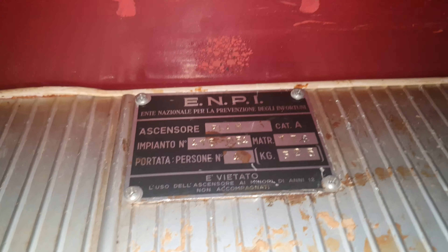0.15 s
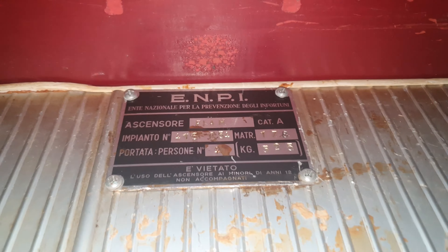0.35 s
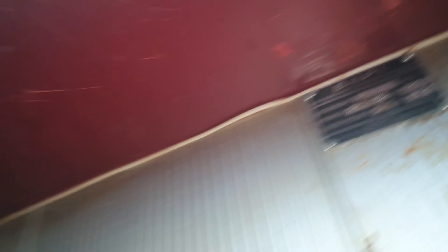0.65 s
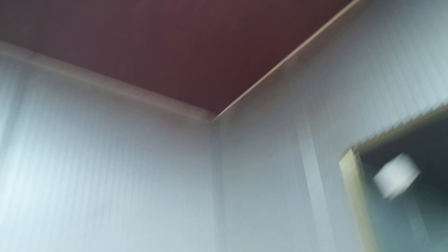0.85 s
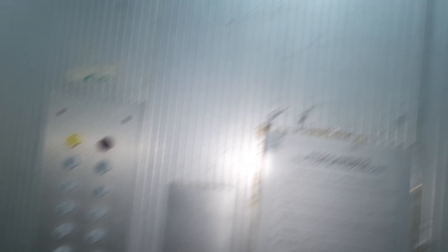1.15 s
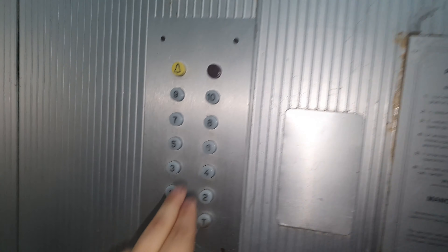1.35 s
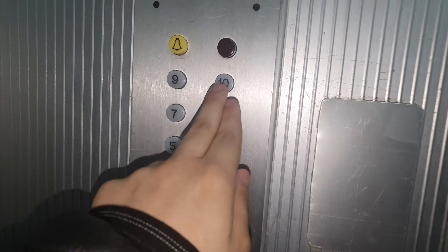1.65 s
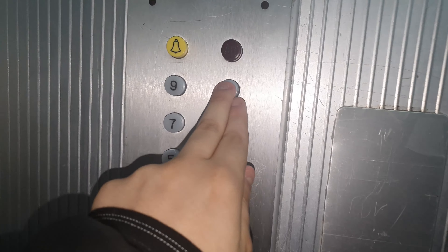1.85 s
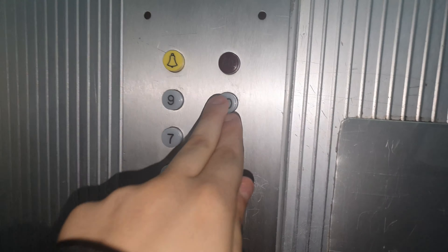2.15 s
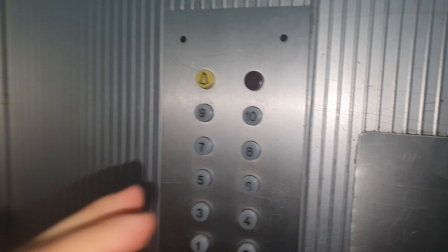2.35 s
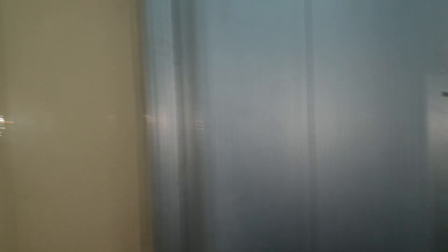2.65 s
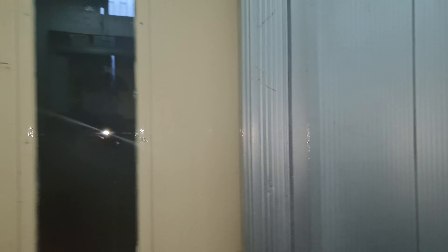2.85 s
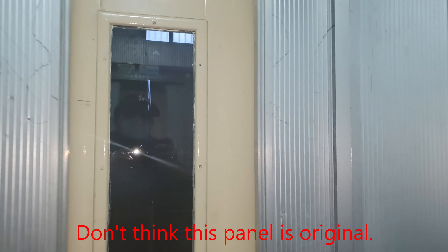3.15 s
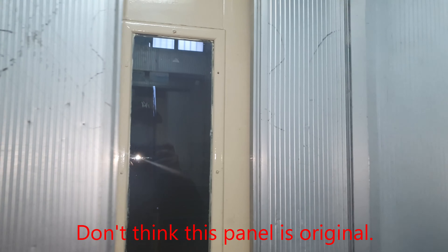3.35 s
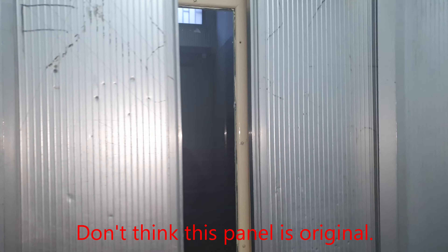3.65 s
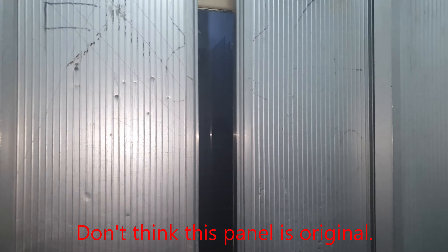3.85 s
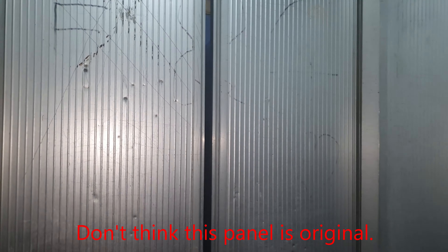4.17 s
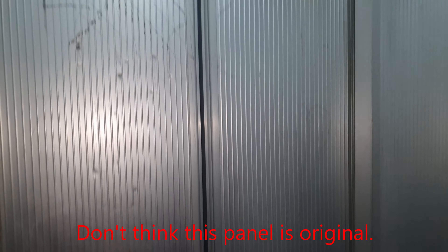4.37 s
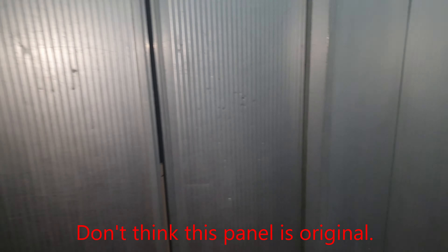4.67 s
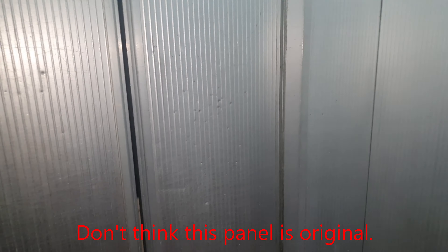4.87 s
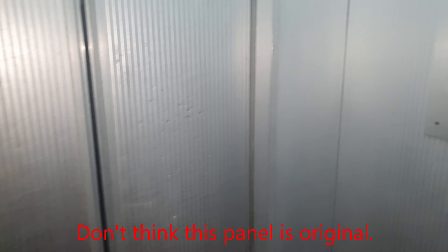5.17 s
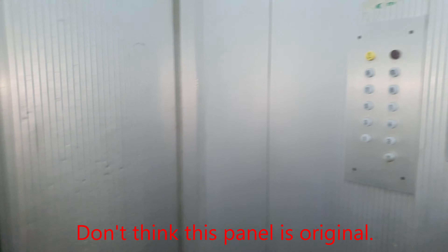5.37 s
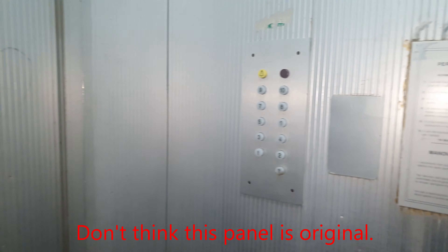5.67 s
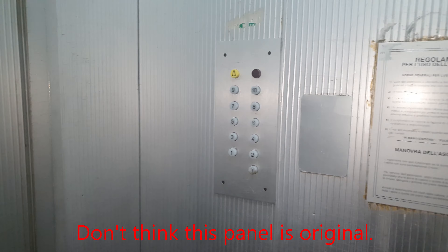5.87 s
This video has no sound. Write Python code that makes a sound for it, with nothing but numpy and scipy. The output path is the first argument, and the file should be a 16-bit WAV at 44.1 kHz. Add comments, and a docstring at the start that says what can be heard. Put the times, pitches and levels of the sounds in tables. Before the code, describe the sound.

A handheld stereo microphone sits between thin metal walls. First comes a heavy multiple door slam with a low boom and short dull shaft echo, then near quiet with faint rumble. A sharp button clunk starts the door drive; rollers grind, tick and squeak, panels knock unevenly, then two loud bangs close the doors. Smaller latch knocks and a last scrape die into soft rumble and hiss.

```python
"""Inside a small metal lift car, heard by a two-port microphone among the walls: first a landing door slams and
the stairwell rumbles on, then a button is pushed, then the sliding doors jolt, rattle along their track and
latch. Every blow rings the same car modes and throws a burst of noisy panel clatter. A low rumble runs
throughout, stronger with the door drive on, over a faint flickering hiss that swells while the doors move; as
they move, the rollers scrape and squeak. A short dull tail from the shaft answers blows and squeaks."""
import sys
import numpy as np
from scipy import signal
from scipy.fft import rfft, irfft
from scipy.io import wavfile
from scipy.ndimage import uniform_filter1d

SR = 44100
rng = np.random.default_rng(int(sys.argv[2]) if len(sys.argv) > 2 else 0)


def transcribe(signal):
    """Save signal, clipped to [-1, 1], as a 16-bit WAV file at the path in sys.argv[1]."""
    frames = np.atleast_2d(signal).T
    limited = np.clip(frames, -1, 1)
    pcm = np.round(limited * 32767).astype(np.int16)
    wavfile.write(sys.argv[1], SR, pcm)


N = 265173

# Blows of slam, button and doors: start_s, clatter_db, sizzle_over_clatter_db, knock_db, knock_centre_hz,
# boom_db, boom_centre_hz, clatter_t60_s, clank_over_clatter_db, thud_db
BLOWS = [(0.0334, -12.5, -20.5, -23, 735, -6.5, 183, 0.21, -4, -16.5),
         (0.2031, -16, -18.5, -23, 970, -3.5, 155, 0.19, -6.5, -10.5),
         (0.287, -13, -15.5, -47, 507, -17, 218, 0.26, -12, -29),
         (0.333, -12, -17.5, -29, 460, -9, 185, 0.14, -9, -20),
         (0.342, -16, -17, -35, 465, -20, 181, 0.16, -0.5, -19),
         (0.7183, -39.5, -16, -49, 570, -25.5, 106, 0.39, -3.5, -50),
         (1.07, -39.5, -17, -52, 600, -45, 60, 0.14, -6.5, -45),
         (1.209, -46, -15, -69, 475, -25.5, 59.6, 0.51, -11, -52),
         (1.688, -48, -12, -46, 497, -44, 97, 0.1, 2.5, -49),
         (1.7871, -44, -29.5, -39, 474, -45, 67, 0.26, 3, -37),
         (1.8606, -37.5, -23, -36.5, 646, -25.5, 89, 0.22, -5, -35),
         (1.949, -48, -18, -29, 804, -50, 143, 0.63, 1, -42),
         (2.0039, -59, -15, -27.5, 790, -26, 70, 0.24, 4, -24),
         (2.0357, -19.5, -28, -9, 486, -7, 180, 0.18, -3.5, -9),
         (2.1186, -16, -21, -34, 900, -18.5, 182, 0.12, -9, -22),
         (2.338, -28.5, -22.5, -23.5, 740, -18, 61, 0.2, -1, -18),
         (2.352, -39, -17, -21.5, 710, -24, 180, 0.15, -13, -36),
         (2.369, -26, -11.5, -23.5, 670, -30, 72, 0.074, -14, -19),
         (2.4274, -34, -16, -42, 620, -18.5, 90, 0.3, -9, -37),
         (2.4393, -39.5, -12, -26, 635, -17, 60, 0.91, 1.5, -31),
         (2.59, -26, -15.5, -36, 503, -24, 93, 0.15, -6.5, -28),
         (2.63, -34, -20, -19.5, 575, -30.5, 92, 0.053, -2, -20.5),
         (2.74, -35, -15, -63, 540, -44, 75, 0.51, -10, -51),
         (2.8776, -17.5, -28, -31.5, 860, -33.5, 100, 0.21, -7, -25),
         (3.23, -29, -28, -33, 654, -27, 99.5, 0.18, -9, -25),
         (3.2904, -30.5, -22, -37, 467, -21, 60.8, 0.64, -3.5, -37),
         (3.3424, -24.5, -25, -30, 540, -18.5, 92.2, 0.38, -10, -26),
         (3.437, -24, -34.5, -25.5, 560, -46, 95, 0.24, -4, -34),
         (3.4828, -21, -26, -25.5, 550, -32, 102, 0.2, -9, -37),
         (3.5652, -25, -30.5, -25, 570, -30.5, 90, 0.33, -5, -27),
         (3.6488, -24.5, -30, -22.5, 463, -22, 70, 0.32, -7.5, -21.5),
         (3.6998, -31, -36, -46, 606, -26, 102, 0.24, -9, -25),
         (3.7801, -22.5, -32.5, -29.5, 510, -30, 84, 0.27, -5, -26.5),
         (3.913, -12, -14, -18, 600, -18, 81, 0.13, -1, -16.5),
         (3.962, -29.5, -19, -14.5, 850, -31.5, 78, 0.19, -1.5, -16),
         (3.968, -7, -21.5, -10, 623, -23.5, 77, 0.23, -9, -23.5),
         (4.0621, -41.5, -18, -17, 508, -27, 180, 0.43, 11.5, -21),
         (4.0895, -14.5, -24.5, -13.5, 523, -22.5, 75, 0.12, -10, -15),
         (4.112, -32.5, -13, -15, 576, -29, 90, 0.21, 3, -18),
         (4.1419, -20, -26.5, -24, 476, -26, 87.5, 0.16, -8.5, -21),
         (4.267, -42.5, -6, -25, 465, -22.5, 93, 0.17, 3, -27),
         (4.2915, -32, -33, -22, 510, -35, 92, 0.22, 2.5, -28),
         (4.332, -55, -25, -27, 535, -36, 92, 0.2, -9.5, -37),
         (4.3899, -41, -21, -29.5, 455, -27, 247, 0.39, -2.5, -25),
         (4.5446, -23.5, -27.5, -29, 506, -31.5, 243, 0.11, -6.5, -24),
         (4.628, -31.5, -19, -39.5, 850, -29.5, 93.5, 0.26, -17.5, -28.5),
         (4.659, -48, -18, -35.5, 810, -34, 94, 0.28, -11, -33),
         (4.769, -56, -38, -39, 480, -28.5, 84, 0.2, 4, -35),
         (4.802, -60.5, -30, -36.5, 500, -48, 94, 0.25, -4, -45),
         (4.945, -60, -16, -40.5, 496, -39, 55, 0.22, -7, -44)]
# Modes of the car walls: pitch_hz, level_db, base_t60_s (scaled for each use)
CAR_MODES = [(44.9, -2, 0.99), (70.1, -4, 0.61), (94.1, -1.5, 0.87), (155.9, 4.5, 0.53), (183.9, 3.5, 0.97),
             (233.5, 3.5, 0.37), (284.6, 1, 0.35), (310.1, -2.5, 0.24), (351.3, -4.5, 0.47),
             (407.3, 0.5, 0.28), (438.5, -5, 0.21), (492.6, 0, 0.13), (552, -13.5, 0.46), (592, -8.5, 0.32),
             (661, -14, 0.6), (711, -8.5, 0.29), (790, -8.5, 0.16), (869, -7.5, 0.22)]
# Modes of the door panels: pitch_hz, level_db, base_t60_s (scaled for each use)
PANEL_MODES = [(934, -6.5, 0.28), (1096, -9, 0.25), (1202, 2, 0.17), (1347, -2.5, 0.032), (1465, -9, 0.099),
               (2176, -1, 0.058), (2530, -3, 0.09), (3000, -5, 0.11), (3326, -3, 0.075), (3842, -2, 0.096),
               (4340, 2, 0.037), (5370, 15, 0.012), (6140, 3, 0.11)]
# Spectrum of loose panels clattering: pitch_hz, level_db (per Hz)
CLATTER_SPECTRUM = [(470, -30), (800, 2), (1200, -1), (2440, -7), (4160, -8), (6920, -9), (8030, -18),
                    (9320, -16), (15500, -26.5)]
CLATTER_HZ, CLATTER_SPREAD_OCTAVES = 3295, 0.31  # random spread of the clatter centre from blow to blow
# Blows with less sizzle than DULL_DB clatter lower, narrower and more ringing
DULL_DB, DULL_OCTAVES_PER_DB, FOCUS_OCTAVES = -17, 0.025, 1.6
SLAM_ENDS_S = 0.4
SLAM_BOOM_RING, JOLT_BOOM_RING = 0.48, 0.57  # share of the base ring time left to the boom


def blows():
    """Each blow throws a burst of clatter, rings the door panels and sets the car walls ringing."""
    out = np.zeros((2, N + SR))
    clank = pair(band(CLATTER_SPECTRUM, 1000, 1800))
    clatter = pair(band(CLATTER_SPECTRUM, 1800, 7500))
    sizzle = pair(band(CLATTER_SPECTRUM, 7500, 20000))
    bounce = undb(1.8 * walk(120))  # loose panels rebound unevenly
    # the walls buzz, so rings die unevenly
    shudder = np.pad(undb(1.62 * walk(70)), (0, SR), mode="reflect")
    low_panel, high_panel = between(PANEL_MODES, 0, 1800), between(PANEL_MODES, 1800, SR)
    n = SR // 5
    t = np.arange(n) / SR
    bin_hz = np.arange(n // 2 + 1) * SR / n
    shifts = 2 ** (CLATTER_SPREAD_OCTAVES * rng.standard_normal(len(BLOWS)))
    for blow, shift in zip(BLOWS, shifts):
        (start_s, clatter_db, sizzle_db, knock_db, knock_hz,
         boom_db, boom_hz, t60, clank_db, thud_db) = blow
        i = int(start_s * SR) - 40  # a short lead for the gradual onset
        now = slice(i, i + n)
        dull = max(DULL_DB - sizzle_db, 0)
        centre_hz = CLATTER_HZ * shift * 2 ** (-DULL_OCTAVES_PER_DB * dull)
        focus = FOCUS_OCTAVES / (1 + 0.084 * dull)

        rise_s = 0.00056 + 0.038 * t60 ** 2  # long rattles build up more slowly
        burst = (1 - np.exp(-t / rise_s)) * fall(t, t60) * bounce[now]
        coloured = unit(irfft(rfft(clatter[:, now]) * undb(favour(bin_hz, centre_hz, focus)), n))
        sound = undb(-4.0) * burst * coloured
        sound += undb(sizzle_db + 2.0) * burst ** 1.03 * sizzle[:, now]

        high_ring = ring(high_panel, t, 5.2 * t60, 0.0039, centre_hz, 0.64, detune=0.022)
        sound += undb(-4.5 + 0.2 * dull) * shudder[now] * high_ring

        low_ring = ring(low_panel, t, 7.4 * t60, 0.003, 1100.0, 1.5, spread_db=-1.5, detune=0.01)
        clanking = undb(-2.5) * burst * clank[:, now] + undb(-7.5) * shudder[now] * low_ring
        sound += undb(clank_db) * clanking
        out[:, now] += undb(clatter_db) * sound

        boom_ring = SLAM_BOOM_RING if start_s < SLAM_ENDS_S else JOLT_BOOM_RING
        low = car_ring(knock_db, knock_hz, thud_db, boom_db, boom_hz, boom_ring)
        out[:, i:i + low.shape[1]] += low * shudder[i:i + low.shape[1]]
    return out[:, :N]


def car_ring(knock_db, knock_hz, thud_db, boom_db, boom_hz, boom_ring):
    """Decaying car modes answer one blow in three bands: a knock, a thud and a boom."""
    knock = between(CAR_MODES + PANEL_MODES, 460, 1000)
    thud, boom = between(CAR_MODES, 260, 460), between(CAR_MODES, 0, 260)
    # knock and thud modes are doubled: each copy is detuned, so the close pair beats
    knock, thud = knock + knock, thud + thud
    # the modes are slow, so they are drawn at a twentieth of the rate and smoothed up
    t = np.arange(SR // 40) / (SR / 20)
    low = undb(knock_db) * ring(knock, t, 0.82, 0.002, knock_hz, 0.4, spread_db=3.5, detune=0.0163)
    low += undb(thud_db) * ring(thud, t, 0.79, 0.0053, 330., 0.76, spread_db=1.0, detune=0.02)
    low += undb(boom_db) * ring(boom, t, boom_ring, 0.0076, boom_hz, 0.68, scatter=0.68)
    return signal.resample_poly(low, 20, 1, axis=1)


def ring(modes, t, damp, rise_s, centre_hz, octaves, spread_db=7.0, detune=0.016, lag_s=0.00032,
         scatter=2.954):
    """Modes set ringing by one blow, which favours those near its centre; scaled by their summed power."""
    f, db, t60 = np.transpose(modes)
    chance = rng.standard_normal((4, len(f)))
    hz = f * (1 + detune * chance[1])
    pole = 2j * np.pi * hz - np.log(1000) / (damp * t60)
    level = undb(db + favour(f, centre_hz, octaves) + spread_db * chance[0])
    # the scatter sets how far the modes start out of step: the default leaves their phases at random, while a
    # small one, as for the boom, starts them nearly in step
    size = level * np.exp(1j * (scatter * chance[2] - np.pi / 2))
    # each mode reaches the two ports from its own side
    turn = np.exp(1j * np.pi * hz * lag_s * chance[3])
    out = (np.array([size * turn, size / turn]) @ np.exp(pole[:, None] * t)).real
    return out * (1 - np.exp(-t / rise_s)) / np.sqrt(np.sum(np.abs(size) ** 2))


# Roller squeaks: start_s, length_s, start_pitch_hz, end_pitch_hz, level_db, roughness (ratio)
SQUEAKS = [(0.71, 0.021, 2650, 2800, -39.5, 1.4), (2.179, 0.066, 1243, 1243, -38.5, 0.33),
           (2.24, 0.041, 1250, 1220, -35.5, .3), (2.366, 0.025, 3054, 3020, -36, .5),
           (2.43, .07, 2750, 2650, -42, .9), (2.454, 0.03, 4430, 4430, -37, .7),
           (2.473, 0.087, 5440, 5500, -40, .6), (2.53, 0.05, 4650, 4800, -35, .9),
           (2.7, 0.023, 3550, 3280, -35.5, 1.3), (2.768, 0.023, 4260, 4260, -37, .8),
           (2.772, 0.038, 2750, 2800, -51, .7), (3.34, 0.034, 2420, 2430, -28, 0.51),
           (3.44, 0.032, 2250, 2220, -34, .6), (3.482, 0.022, 2230, 2200, -35, 0.55),
           (4.587, 0.153, 2600, 2820, -43, 1.1)]


def squeaks():
    """Short rough tones where a roller sticks and slips: each slip nudges the size and phase."""
    out = np.zeros((2, N))
    slip = walk(420) + 1j * walk(460)
    port_phase = np.array([[0], [1.5]])  # radians
    for start_s, length_s, start_hz, end_hz, db, rough in SQUEAKS:
        i, n = int(start_s * SR), int(length_s * SR)
        phase = 2 * np.pi * np.cumsum(np.linspace(start_hz, end_hz, n)) / SR
        nudge = (1 + rough * slip[i:i + n]) / np.hypot(1, rough)
        tone = nudge * np.exp(1j * (phase + port_phase))
        out[:, i:i + n] += undb(db) * np.hanning(n) ** 0.6 * tone.real
    return out


# Level of the scrape and hiss, with a faint steady background between door movements:
# start_s, scrape_db, hiss_db (before their flicker)
SCRAPE_AND_HISS = [(0, -57, -70), (0.4, -48, -72), (0.84, -49, -62.5), (1.1, -53.5, -66),
                   (1.45, -49, -64.5), (1.61, -53, -64), (1.76, -62.5, -75), (2.02, -54, -71),
                   (2.14, -38, -59), (2.26, -47.5, -62), (2.53, -35.5, -50), (2.71, -40.5, -50),
                   (2.96, -49.5, -61), (3.25, -39.5, -55), (3.57, -31, -50), (3.82, -44, -58.5),
                   (3.98, -31, -70), (4.2, -53, -60), (4.3, -40.5, -59), (4.42, -55.5, -60.5),
                   (4.59, -37.5, -47), (4.75, -53, -61.5), (4.99, -68.5, -89), (5.15, -56, -60),
                   (5.35, -55.5, -63), (5.59, -51, -64.5), (6.01, -56.5, -68.5)]
# Centre of the scrape, highest as the doors get under way: start_s, pitch_hz
SCRAPE_CENTRE = [(0, 2800), (2.0, 2400), (2.15, 3400), (2.55, 4360), (2.95, 2710), (3.85, 2500),
                 (4.1, 3100), (4.8, 2780), (5.15, 3640), (5.6, 2640)]
# Spectrum of the scrape: pitch_hz, level_db (per Hz)
SCRAPE_SPECTRUM = [(410, -32), (700, -15), (1140, -1.5), (1580, -5), (2370, -4), (3550, -6), (5000, -8.5),
                   (6150, -7.5), (8420, -16.5), (11700, -13.5), (16000, -20.5)]


def scrape_and_hiss():
    """Rollers scrape the track in uneven patches of noise and tick the panel modes, with a hiss on top."""
    scrape_db, hiss_db = curve(SCRAPE_AND_HISS)
    centre_hz, = curve(SCRAPE_CENTRE)
    grain = walk(45)
    edges = 800 * 2 ** np.arange(0, 3.3, .54)
    # a louder scrape gathers round its centre and grows grittier
    tight = np.clip((scrape_db + 50.5) / 15, 0.25, 1.5)
    broad = np.zeros((2, N))
    for lo, hi in zip(edges, edges[1:]):
        patch_db = tight * favour(lo * 1.12, centre_hz, 1.24) + band_db(SCRAPE_SPECTRUM, lo, hi)
        broad += pair(band(SCRAPE_SPECTRUM, lo, hi)) * undb(patch_db + 2.0 * tight * walk(28.13))
    panels = np.zeros((2, N))
    for hz, _, t60 in PANEL_MODES[2:]:
        panels += ticks(hz, t60) * undb(favour(hz, centre_hz, 0.75))
    scrape = undb(-1.5) * broad + undb(-11.0) * tight * panels
    scrape *= undb(scrape_db + 2.2 * tight * grain)
    hiss = pair(band(SCRAPE_SPECTRUM, 7500, 20000)) * undb(hiss_db + grain)
    return scrape + hiss


TICKS_PER_S, TICK_SPREAD_DB, TICK_DAMP, TICK_WANDER = 400, 2.5, 0.8, 0.05  # for each panel mode


def ticks(hz, t60):
    """Grit under the rollers strikes one panel mode, a two-pole resonator, at random moments."""
    chance = rng.random((int(TICKS_PER_S * N / SR), 4)).T
    size = undb(-TICK_SPREAD_DB * np.log(chance[1] + 1e-9))
    port_phase = np.array([[0], [1]]) * 2 * (chance[3] - .5) * np.pi
    strikes = np.zeros((2, N))
    strikes[:, (chance[0] * N).astype(int)] = size * np.cos(2 * np.pi * chance[2] + port_phase)
    r = np.exp(-np.log(1000) / (TICK_DAMP * max(t60, .06) * SR))
    rung = signal.lfilter([1], [1, -2 * r * np.cos(2 * np.pi * hz / SR), r ** 2], strikes)
    # the pitch of the ticks wanders at random
    read_at = np.cumsum(1 + TICK_WANDER * walk(14)) % (N - 1)
    return unit(np.array([np.interp(read_at, np.arange(N), side) for side in rung]))


# Low shaking of the car, at rest and with the door drive on: start_s, level_db
DRIVE = [(0, -36), (0.9, -45), (1.61, -46.5), (1.76, -51.5), (1.86, -36), (2.02, -33.5), (2.14, -22.5),
         (2.26, -29.5), (2.38, -27), (3.3, -27.5), (3.82, -21.5), (3.98, -35.5), (4.22, -29), (4.52, -23.5),
         (4.75, -37.5), (4.9, -41.5), (5.15, -44.5), (5.31, -43), (5.93, -43.5), (6.01, -37.5)]
DRONE_DB, RATTLE_DB = -10, -9  # drone against the shaking; rattle against shaking mixed with scrape
RATTLE_FROM_SCRAPE = 0.28  # share of the scrape level in that mix
AFTER_RUMBLE_DB, AFTER_DRONE_DB, AFTER_RATTLE_DB = -11, -11.5, -8  # tail below the blow


def shaking():
    """Noise through the car modes makes rumble, drone and rattle, raised by a tail after each blow."""
    drive_db, = curve(DRIVE)
    scrape_db, _ = curve(SCRAPE_AND_HISS)
    knock_tail, boom_tail = low_tail(column=3), low_tail(column=5)  # after the knocks and the booms
    rumble_db = add_tail(drive_db, AFTER_RUMBLE_DB, boom_tail)
    drone_db = add_tail(drive_db + DRONE_DB, AFTER_DRONE_DB, boom_tail)
    rattle_db = mix(drive_db, scrape_db, RATTLE_FROM_SCRAPE) + RATTLE_DB
    rattle_db = add_tail(rattle_db, AFTER_RATTLE_DB, knock_tail)
    rumble = pair(resonant(CAR_MODES, 0, 130, widen=3.0)) * undb(rumble_db)
    drone = pair(resonant(CAR_MODES, 130, 330, widen=4.0)) * undb(drone_db + 0.45 * walk(25.06))
    # the rattle swings unevenly, by the same amount throughout
    rattle = pair(resonant(CAR_MODES, 330, 1000, widen=9.5)) * undb(rattle_db + 3.5 * walk(40))
    return rumble + drone + rattle


SLAM_T60_S, JOLT_T60_S = 1.184, 0.27  # how long the low tail lasts after the slam and after later blows


def low_tail(column):
    """Power of the low tail that follows the blows, dying away after each."""
    out, t = np.zeros(N), np.arange(N) / SR
    for row in BLOWS:
        i = int(row[0] * SR)
        after = t[:N - i]
        t60 = SLAM_T60_S if row[0] < SLAM_ENDS_S else JOLT_T60_S
        out[i:] += (undb(row[column]) * fall(after, t60) * (1 - np.exp(-after / 0.016))) ** 2
    return out


def add_tail(steady_db, after_db, power):
    """Level in dB once the power of the tail is added to a steady level."""
    return 10 * np.log10(undb(2 * steady_db) + undb(2 * after_db) * power)


def resonant(modes, lo, hi, widen):
    """Gain per bin of a set of modes driven by steady shaking."""
    hz = np.arange(N // 2 + 1) * SR / N
    power = 0
    for f, db, t60 in between(modes, lo, hi):
        peak = undb(2 * db) / (1 + ((hz - f) * t60 / widen) ** 2)
        power = power + peak * (hz / f) ** 2 / (1 + (hz / f) ** 4)
    return np.sqrt(power)


SHAFT_DB, SHAFT_T60_S = -17, 0.53


def shaft(x):
    """A dull diffuse tail from the lift shaft: decaying low-passed noise, partly shared by the ports."""
    t = np.arange(SR) / SR
    tail = rng.standard_normal((2, SR)) * fall(t, SHAFT_T60_S) * (1 - np.exp(-t / 0.0036))
    tail = signal.lfilter([1], [1, -.6], tail)
    tail[1] = .5 * tail[0] + 0.15 * tail[1]
    tail /= np.sqrt(np.sum(tail[0] ** 2))
    return undb(SHAFT_DB) * signal.fftconvolve(x, tail, axes=1)[:, :N]


def undb(db):
    """Amplitude of a level in dB."""
    return 10 ** (np.asarray(db) / 20)


def unit(x):
    """Scale to an RMS of 1."""
    return x / np.sqrt(np.mean(x ** 2))


def fall(t, t60):
    """Exponential decay by 60 dB in t60 seconds, never quicker than 0.02 s."""
    return np.exp(-np.log(1000) * t / max(t60, .02))


def walk(rate):
    """Random levels held 1 / rate s and slewed twice; they swing around zero."""
    k = int(SR / rate)
    steps = np.repeat(rng.standard_normal(N // k + 1), k)
    return 0.96 * uniform_filter1d(uniform_filter1d(steps, k), k)[:N]


def pair(gain, alike_hz=760.0):
    """Noise with a given gain per bin; the two microphone ports agree in the bass only."""
    hz = np.arange(len(gain)) * SR / N
    mid, side = rfft(rng.standard_normal((2, N)))
    share = np.clip((hz / alike_hz) ** 1.08, 0, 1.1)
    return unit(irfft(gain * np.array([mid + share * side, mid - share * side]), N))


def band(points, lo, hi):
    """Gain per bin of a spectrum of pitch_hz and level_db, kept between two edges."""
    hz = np.arange(N // 2 + 1) * SR / N + 1
    f, db = np.transpose(points)
    return undb(np.interp(np.log(hz), np.log(f), db)) * (hz >= lo) * (hz < hi)


def band_db(points, lo, hi):
    """Share in dB of a spectrum's power between two edges."""
    return 10 * np.log10(np.sum(band(points, lo, hi) ** 2) / np.sum(band(points, 0, SR) ** 2))


def favour(hz, centre_hz, octaves):
    """dB weight of frequencies around the centre that a contact excites best."""
    return -6 * np.log2(np.maximum(hz, 1) / centre_hz) ** 2 / octaves ** 2


def between(modes, lo, hi):
    """The modes whose pitch lies between two edges."""
    return [m for m in modes if lo <= m[0] < hi]


def mix(a, b, share):
    """Blend b into a by a share."""
    return (1 - share) * a + share * b


def curve(table):
    """Each column of a table drawn as straight lines over its start_s."""
    s, *columns = np.transpose(table)
    return [np.interp(np.arange(N) / SR, s, c) for c in columns]


def scene():
    """Blows and squeaks with their shaft tail, over the shaking, scrape and hiss."""
    hits = blows() + squeaks()
    return hits + shaft(hits) + shaking() + scrape_and_hiss()


# Colour of the two microphone ports: pitch_hz, left_minus_right_db
PORTS = [(60, 0), (110, -2), (200, -0.5), (380, 0.5), (700, 0), (1290, -1), (2380, -1), (4400, -4.5),
         (8120, 0.5), (15000, 8)]
TOP_HZ = 16100


def record(dry):
    """The microphone ports differ in colour; deep bass is lost, loud peaks are rounded, the top is cut."""
    f, db = np.transpose(PORTS)
    hz = np.arange(N // 2 + 1) * SR / N
    tilt_db = np.interp(np.log(hz + 1), np.log(f + 1), db) / 2  # half to each port
    x = irfft(rfft(dry) * undb([tilt_db, -tilt_db]), N)
    x = signal.sosfilt(signal.butter(2, 32., "high", fs=SR, output="sos"), x)
    rounded = np.tanh(0.79 * x) / 0.78
    return signal.sosfilt(signal.ellip(10, .2, 70, TOP_HZ, fs=SR, output="sos"), rounded)


dry = scene()
out = record(dry)
transcribe(out)
```